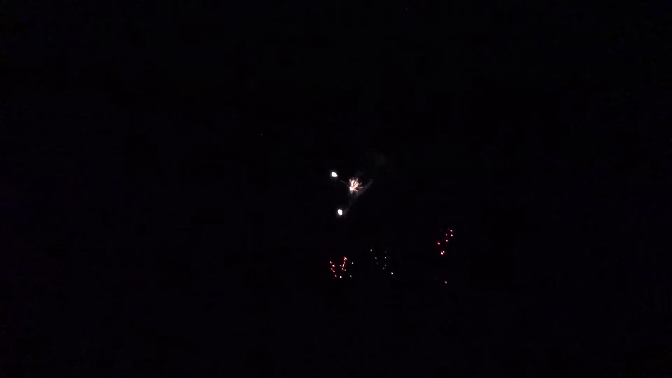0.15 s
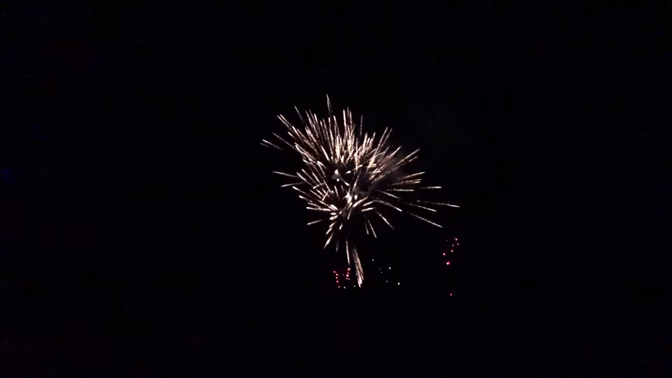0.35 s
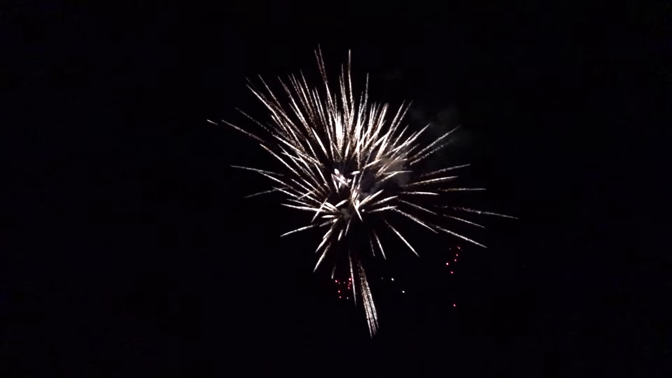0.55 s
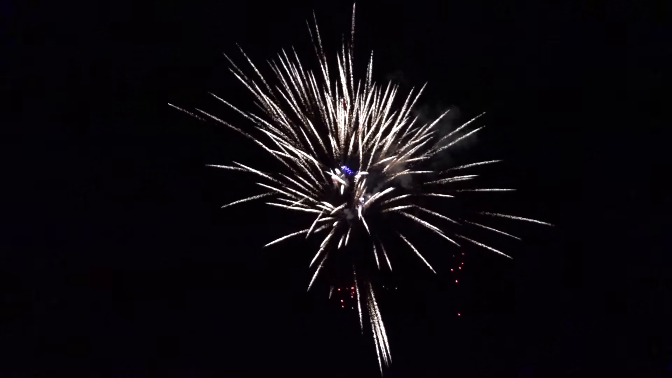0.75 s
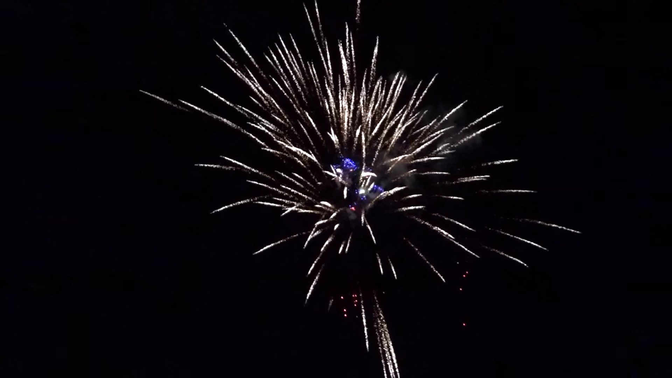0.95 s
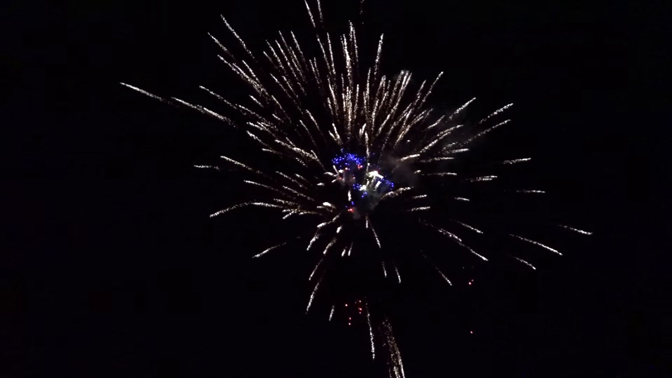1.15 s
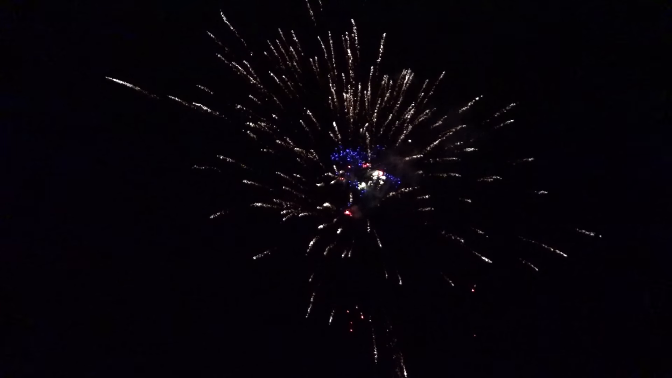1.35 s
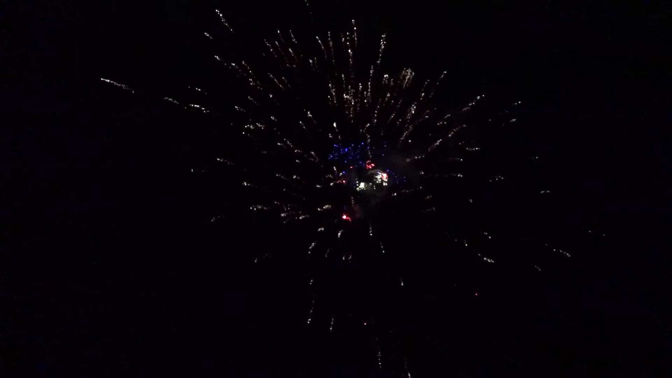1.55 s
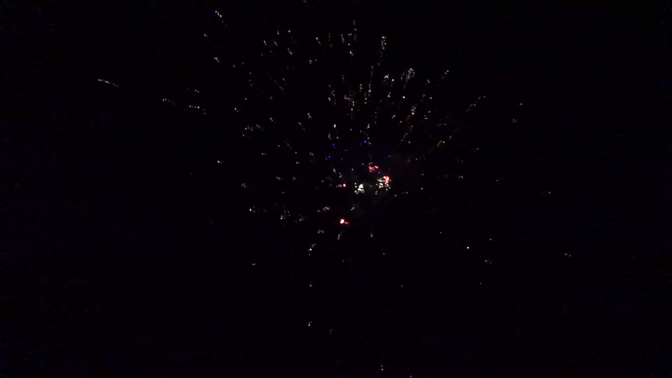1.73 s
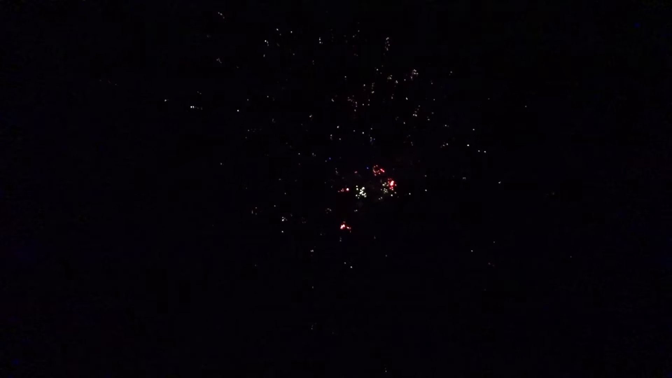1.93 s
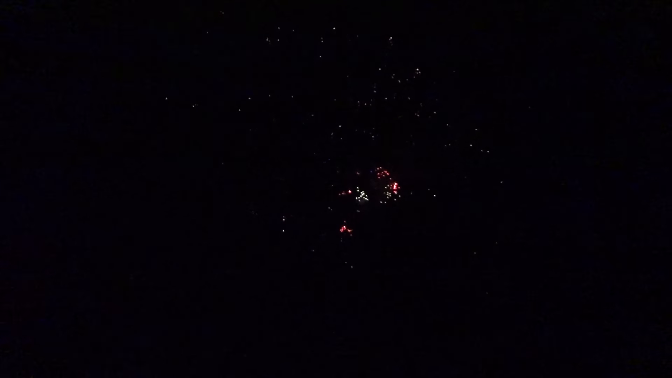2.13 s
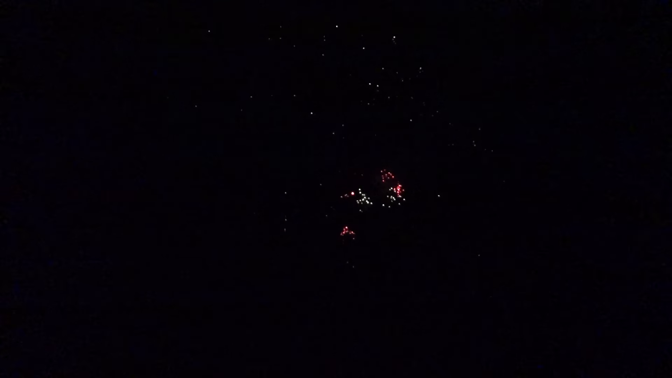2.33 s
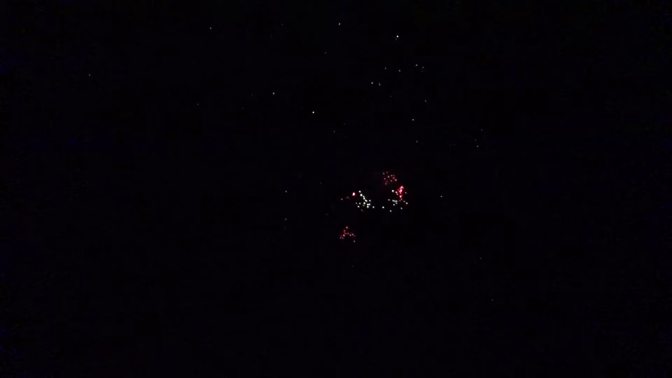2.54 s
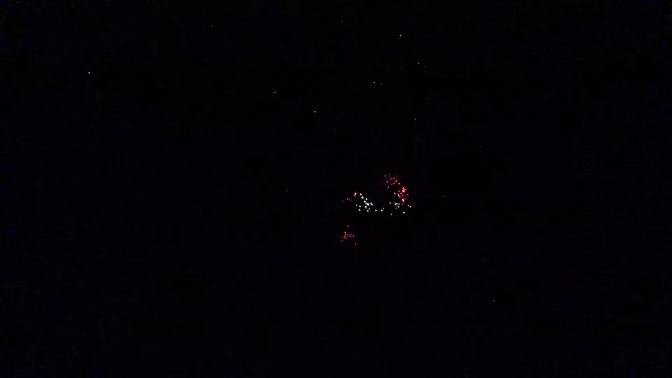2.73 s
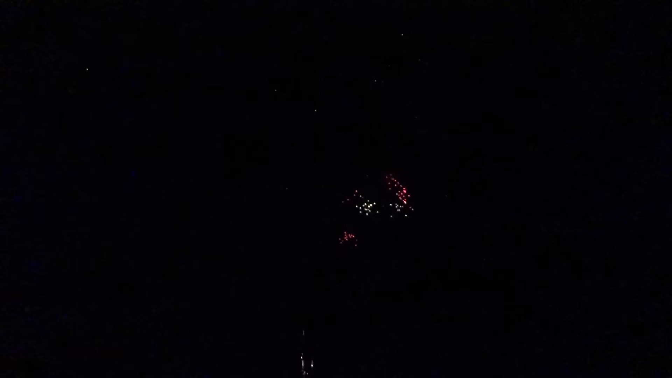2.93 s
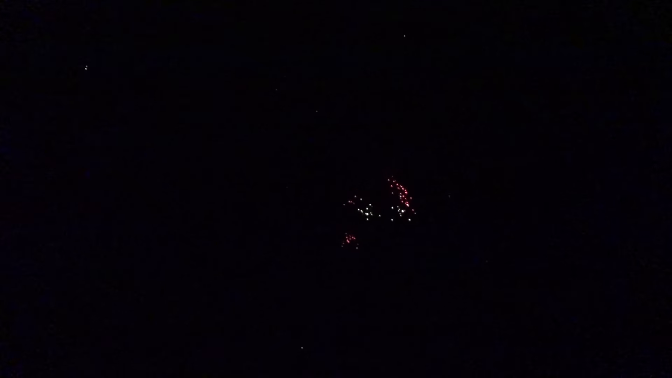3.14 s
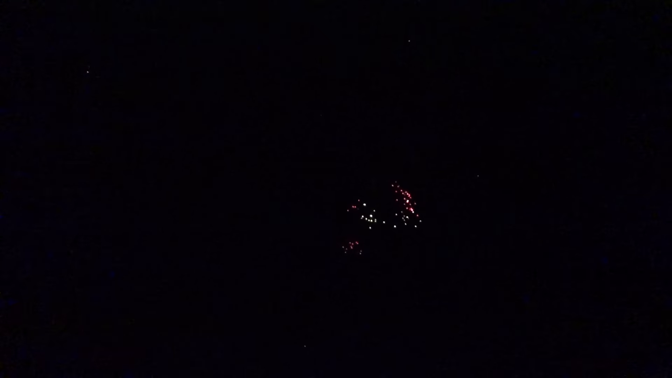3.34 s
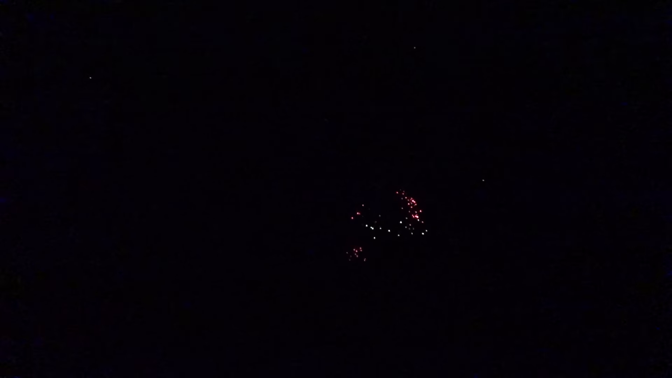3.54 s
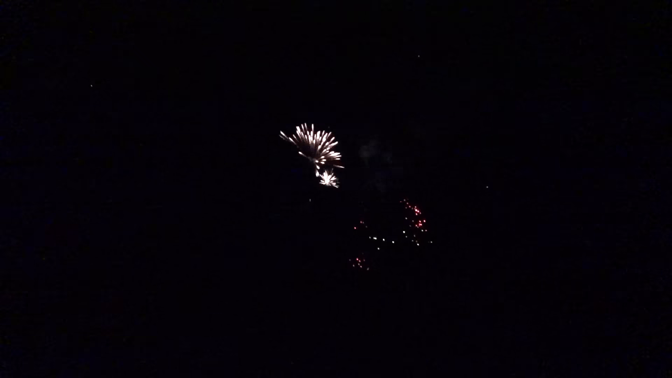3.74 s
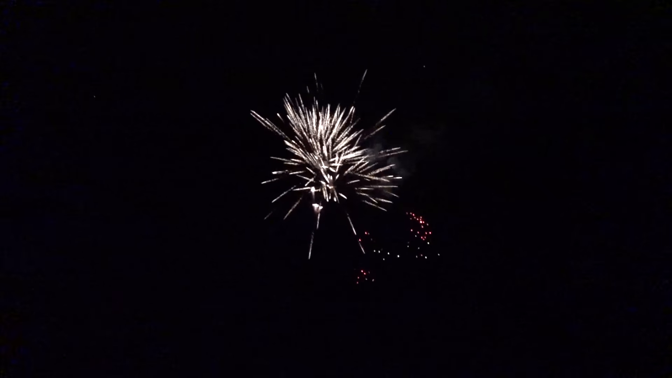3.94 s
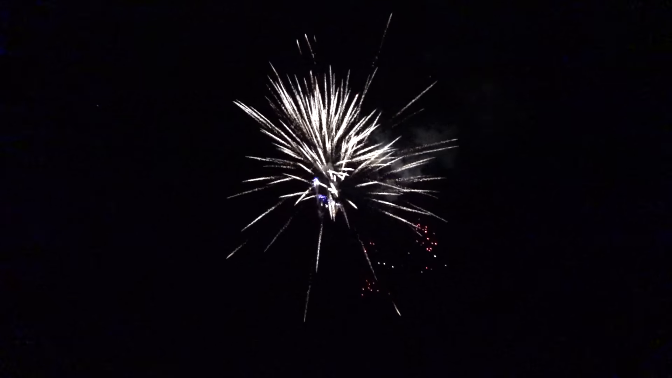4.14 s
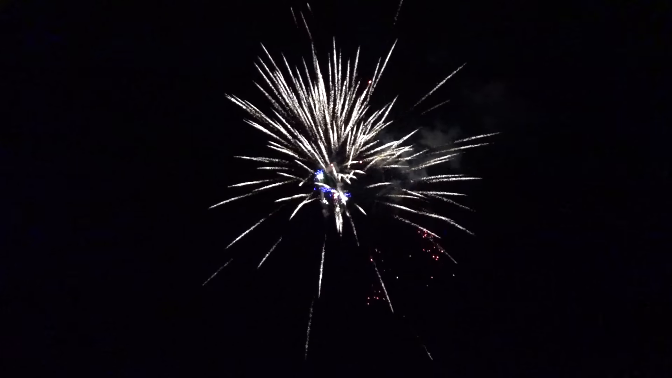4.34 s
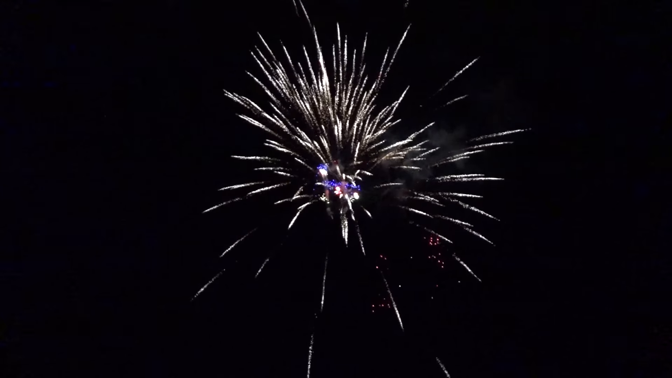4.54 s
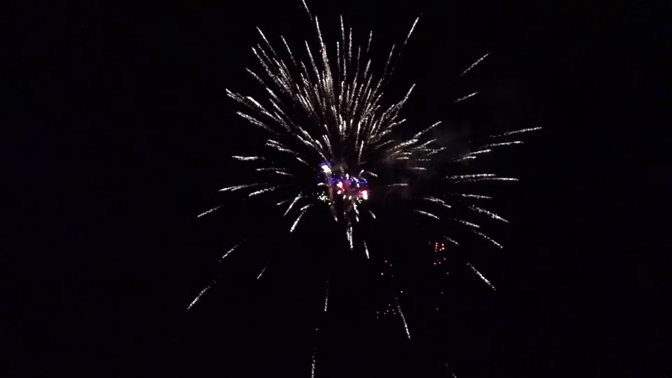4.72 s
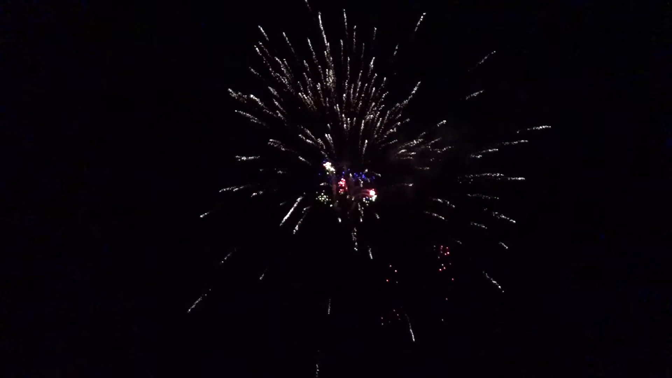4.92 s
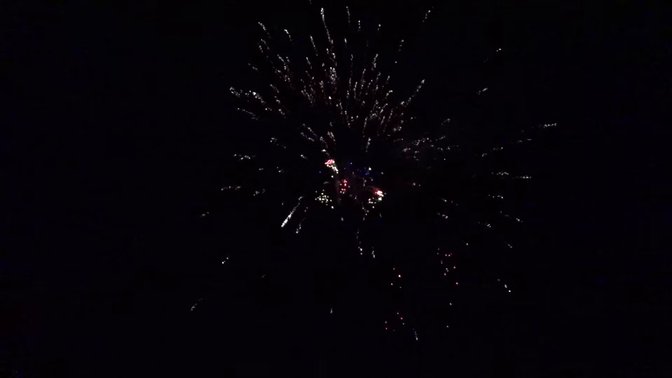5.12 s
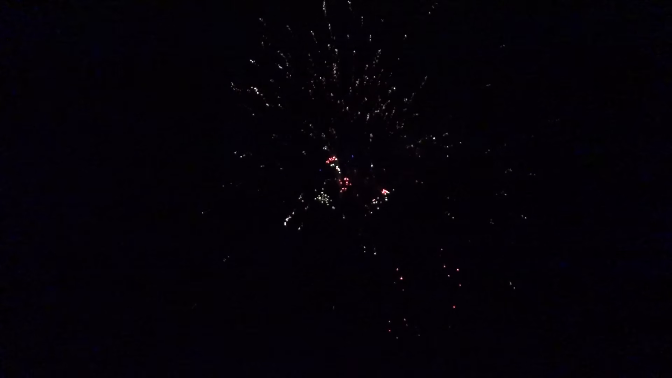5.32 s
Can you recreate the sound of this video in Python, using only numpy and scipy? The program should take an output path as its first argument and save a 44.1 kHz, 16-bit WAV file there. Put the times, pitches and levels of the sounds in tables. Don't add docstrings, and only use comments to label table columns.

```python
import sys
import numpy as np
from scipy import signal
from scipy.fft import rfft, irfft
from scipy.io import wavfile
from scipy.ndimage import uniform_filter1d

SR = 44100
rng = np.random.default_rng(int(sys.argv[2]) if len(sys.argv) > 2 else 0)


def generate_wav(sig):
    pcm = np.round(np.clip(np.atleast_2d(sig).T, -1, 1) * 32767).astype(np.int16)
    wavfile.write(sys.argv[1], SR, pcm)


def convert_level_to_amplitude(level_db):
    exponent = np.asarray(level_db, float) / 20
    return 10 ** exponent


N = 237017
TIME, HZ = np.arange(N) / SR, np.fft.rfftfreq(N, 1 / SR)

# t/s, peak level/dB, fall to suction/ms, closing/ms, ground delay/ms, ground level/dB
SKY_SHOCKS = [(s, db, fall, closing, ground, less) for (s, ground),
              (db, fall, closing, less) in zip( [(.3406, 5.7), (.3582, 5.35), (.3622, 5.95), (3.1255, 2.6),
              (3.8262, 6.0), (3.921, 5.8), (3.9706, 6.0)], [(23.0, 1.05, 0.91, -19), (0.5, 1.43, 1.26, -8),
              (2.3, 1.12, 0.45, -6.5), (2.4, 0.15, 0.19, -6.0), (23.0, 0.95, 0.63, -20.5),
              (16, 1.2, 0.56, -16.0), (24, 1.14, 1.02, -21.5)])]
# t/s, peak level/dB, fall to suction/ms, closing/ms, fence ring f/Hz
SHOTS = [
    (2.6655, 2.995, 1.72, 2.9, 3440),
    (2.7157, 3.005, 1.26, 1.56, 3350),
    (2.763, 3.992, 2.1, 1.85, 3330),
    (2.8086, 3.007, 1.5, 2.2, 3200),
    (2.8524, 4.01, 2.2, 1.9, 3030),
    (2.893, 3.99, 1.24, 3, 2380),
]
# arrival t/s, end t/s
SHOT_SPANS = [
    (.001, .145),
    (.05, .75),
    (.65, .95),
]


def evened(x):
    return x / np.sqrt(np.mean(x ** 2) + 1e-20)


def read(points):
    f, value = np.transpose(points)
    return np.interp(np.log(HZ + 1), np.log(f + 1), value)


def add(mix, s, sound):
    part = mix[..., round(s * SR):][..., :sound.shape[-1]]
    part += sound[..., :part.shape[-1]]


def add_to_ports(mix, s, sound):
    add(mix[0], s, sound)
    add(mix[1], s + 1 / SR, sound)


def shock(db, fall_ms, closing_ms, suction=.9, rise_ms=.045):
    ms = np.arange(400) / SR * 1000
    swing = np.cos(np.pi * np.interp(ms, [0, fall_ms, fall_ms + closing_ms], [0, 1, 2]))
    push = (1 - suction + (1 + suction) * swing) / 2
    pull = suction * (swing - 1) / 2
    return convert_level_to_amplitude(db) * np.minimum(ms / rise_ms, 1) * np.where(ms < fall_ms, push, pull)


def bursts():
    out = np.zeros((2, N))
    for s, db, fall_ms, closing_ms, ground_ms, ground_db in SKY_SHOCKS:
        suction = .9 if fall_ms > .5 else .35
        add_to_ports(out, s, shock(db, fall_ms, closing_ms, suction))
        bounce = shock(db + ground_db, 1.09 * fall_ms, 1.38 * closing_ms, suction, rise_ms=.042)
        add_to_ports(out, s + ground_ms / 1000, bounce)
    return out


def mortars():
    walls = [
        (.0118, -16.5, 230, .02, 0),
        (.0183, -12.5, 290, .03, 0),
        (.0263, -14, 5200, .004, 2.5),
        (.0265, .5, 1600, .0055, 2.5),
        (.0275, -19, 1200, .03, 2),
        (.376, -25, 210, .03, 0),
        (.3762, -28, 1150, .014, 0),
        (.5262, -27, 1650, .007, 0),
    ]
    out = np.zeros((2, N))
    for s, db, fall_ms, closing_ms, *_ in SHOTS:
        add_to_ports(out, s, shock(db + 3, fall_ms, closing_ms, suction=.55, rise_ms=.055))
        for delay, wall_db, hz, t60, pan_db in walls:
            pan = convert_level_to_amplitude([[pan_db / 2], [-pan_db / 2]])
            level_db = wall_db - 22 * (s - 2.66) + rng.normal(0, .86)
            slap = ring(level_db, hz * rng.uniform(.74, 1.12), t60, rough=.14)
            add(out, s + delay, pan * slap)
    return out


def ring(db, hz, t60, rough=.3):
    t, chance = TIME[:3000], rng.standard_normal(3000)
    wobble = np.cumsum(uniform_filter1d(rough * chance, size=9)) * np.sqrt(hz / SR)
    fade = np.minimum(t * hz * 2, 1) * np.clip(2 - 2 * t / t[-1], 0, 1)
    decay = convert_level_to_amplitude(db - 60 * t / np.clip(t60, .001, .09))
    return decay * fade * np.sin(2 * np.pi * hz * t + wobble)


def fence():
    first, spacing, t60 = (.112, .0033, .0024)
    out = np.zeros(N)
    for s, *_, hz in SHOTS:
        for k in range(12):
            rib = ring(-13.5, hz * (.92 + .015 * k), t60, rough=.15)
            rib = rib + ring(-19, .62 * hz, t60, rough=.15)
            add(out, s + first + k * spacing, rib)
    return out


def slaps():
    # t/s, peak level/dB, f/Hz, t60/s; dull house echoes, bright ones, ticks, far chirps
    thumps = [(0.723, -4, 272, 0.028), (0.989, -26, 240, 0.033), (1.087, -14, 148, 0.044),
              (1.16, -10.5, 180, 0.048), (1.171, -13, 187, 0.031), (1.232, -16.5, 184, 0.15),
              (2.117, -25, 530, 0.051), (3.137, -30, 173, 0.03), (4.334, -12, 322, 0.041),
              (4.771, -6, 154, 0.027), (5.292, -19, 191, 0.026)]
    claps = [(0.612, -20, 587, 0.0066), (0.758, -28, 1380, 0.016), (0.774, -20.5, 1700, 0.023),
             (0.844, -12, 686, 0.023), (0.884, -30, 1040, 0.0099), (1.721, -32, 1390, 0.077),
             (3.591, -39, 576, 0.025), (4.353, -21, 1684, 0.043), (4.48, -23, 1695, 0.045),
             (5.259, -29.5, 900, 0.077)]
    ticks = [(1.7215, -41.5, 5300, 0.015), (2.1045, -39.5, 6400, 0.0065), (2.1344, -57, 4750, 0.008),
             (2.2932, -54, 4520, 0.008)]
    chirps = [(2.245, -39, 1513, 0.091), (2.39, -46, 1700, 0.087), (2.47, -46, 1740, 0.1),
              (3.46, -43, 1650, 0.036), (3.5, -43, 1740, 0.045)]
    out = np.zeros(N)
    for table, gain_db, rough in ((thumps, 1.5, .6), (claps, 1.5, 1.5), (ticks, 1.5, .8), (chirps, 0, .05)):
        for s, db, hz, t60 in table:
            add(out, s, ring(db + gain_db, hz, t60, rough))
    return out


def pair(a, b, same):
    c = np.clip(read(same), 0, 1)
    mid, side = np.sqrt((1 + c) / 2) * rfft(a), np.sqrt((1 - c) / 2) * rfft(b)
    return np.array([mid + side, mid - side])


def echo_power(band, step=64):
    # t/s, level/dB
    shell_rolls = [
        (.345, -1.03),
        (3.83, -3),
        (3.94, 0),
    ]
    # arrival t/s, end t/s
    shell_spans = [
        (.001, .39),
        (.1, 2.3),
        (.56, .92),
        (.95, 1.33),
        (1.5, 1.79),
    ]
    # (deep, boom, crash, hiss level/dB against the body)
    shell_echoes = [
        ((-14.5, 56.7), (-12, -2, -3.5, -5)),
        ((-33.5, 5.6), (-11, -14.5, -2, -7.5)),
        ((-36, -6), (3.5, 2.5, -3.5, -24.5)),
        ((-37, 22.5), (3.5, -7, -7, -34)),
        ((-43, -18), (-3, -9.5, -13.5, -27)),
    ]
    shot_echoes = [
        ((-29, 55), (-3, -0.5, -3, -12.5)),
        ((-51, 25.7), (4.4, 7.9, 1.8, 1.5)),
        ((-68, 1.3), (18, 3, 0, 5)),
    ]
    # t/s, level/dB; then their span and echo, columns as above
    facades = [(.755, 2.2), (1.716, -26.5), (3.585, -21), (4.197, -3)]
    facade_span = [(.001, 0.025)]
    facade_echo = [((-41, 45), (-5, -7, 5, 0.5))]
    # start t/s, end t/s; then level/dB per band
    climbs = [
        (-1, .34),
        (2.9, 3.83),
    ]
    climb_db = [-42.5, -51, -58, -64, -64.5]
    # share of the fade, air absorption/dB per s
    fade_share = [.55, .7, 1.01, 1.25, 1.3]
    air_db_per_s = [.1, .15, .2, 3, 14]
    rise_share, fall_s, edge_db = .12, .04, 14

    now = TIME[::step]
    power = convert_level_to_amplitude(2 * climb_db[band]) * sum((now > a) & (now < b) for a, b in climbs)
    shots_alike = [(row[0], 0) for row in SHOTS]
    for shots, spans, echoes in ((shell_rolls, shell_spans, shell_echoes), (facades, facade_span, facade_echo),
                                 (shots_alike, SHOT_SPANS, shot_echoes)):
        for (arrives, ends), ((db, fade), (deep_db, boom_db, *treble_db)) in zip(spans, echoes):
            colour_db = [deep_db, boom_db, 0, *treble_db][band]
            first, last = arrives * (1 - rise_share), ends + fall_s * min(1, ends * 10)
            for s, shot_db in shots:
                t = np.clip(now - s, first, last)
                edges = np.interp(t, [first, arrives, ends, last], [-edge_db, 0, 0, -edge_db])
                level = db + colour_db + shot_db - fade * fade_share[band] * (t - arrives)
                level = level - air_db_per_s[band] * t
                power = power + convert_level_to_amplitude(2 * (level + edges)) * (t > first) * (t < last)
    return np.interp(TIME, now, power)


def roll(per_s=20000, spread_db=.57, lumpy_db=1.5):
    roll_hz = [130, 270, 560, 2000, 6500]
    # f/Hz, level/dB per Hz
    colour = [(53, -44), (90, -0.5), (243, 2.5), (337, -3), (685, -12), (758, -14.5), (892, -12.5),
              (2560, -20), (7820, -40), (10600, -53), (11500, -59), (15000, -104), (22000, -120)]
    # f/Hz, left-right likeness
    likeness = [(60, 0.76), (170, 0.76), (490, 0.73), (1410, 0.82), (4030, 0.69), (11600, 0.13)]
    # f/Hz, left-right level/dB
    lean = [(60, -0.5), (220, 3), (830, 2), (3100, 0.5), (11600, -1)]
    taps = rng.standard_normal((2, N)) * (rng.random((2, N)) < per_s / SR)
    taps *= convert_level_to_amplitude(spread_db * np.minimum(rng.exponential(1, (2, N)), 4))
    lean_db = read(lean) / 2
    z = pair(*taps, likeness) * convert_level_to_amplitude(read(colour) + [lean_db, -lean_db])
    out = np.zeros((2, N))
    for k, share in enumerate(np.eye(len(roll_hz))):
        band = irfft(z * np.interp(np.log(HZ + 1), np.log(roll_hz), share), N)
        lumps = evened(uniform_filter1d(uniform_filter1d(rng.standard_normal(N), 500), 500))
        out += evened(band) * np.sqrt(echo_power(k)) * convert_level_to_amplitude(lumpy_db * lumps)
    return out


def smear():
    shape = np.zeros(N)
    for table, smear_db in ((SKY_SHOCKS, -33), (SHOTS, -31)):
        for s, db, *_ in table:
            fizz_db = smear_db + min(db, 0)
            add(shape, s - .007, convert_level_to_amplitude(fizz_db) * signal.windows.tukey(750, .5))
            add(shape, s - .001, convert_level_to_amplitude(fizz_db + 10) * np.hanning(130))
    fizz = signal.sosfilt(signal.butter(1, 2500, fs=SR, output="sos"), rng.standard_normal((3, N)))
    return shape * evened(fizz[0] + .92 * fizz[1:])


def rumble():
    # t/s, level/dB
    gusts = [(0.0, -45), (0.25, -52), (0.48, -43), (0.75, -45), (1.02, -40), (1.75, -45), (2.11, -49),
             (2.23, -48), (2.68, -49), (2.83, -42.5), (3.22, -48), (3.45, -48), (4.07, -45.5), (4.25, -42),
             (5.37, -38)]
    deep = signal.butter(2, [32, 105], "band", fs=SR, output="sos")
    a, b, c = signal.sosfilt(deep, rng.standard_normal((3, N)))
    gust_db = np.interp(TIME, *np.transpose(gusts))
    return evened(np.array([1.6 * a + .3 * b, a + .33 * c])) * convert_level_to_amplitude(4.5 + gust_db)


def night():
    # f/Hz, level/dB per Hz
    colour = [(12, -27), (20, 20.5), (91, 0), (182, 3), (243, -43), (363, -28), (486, -14.5), (872, -18.5),
              (1610, -22.5), (3670, -43), (7520, -33.5), (10600, -40.5), (11500, -53), (15000, -100),
              (22000, -120)]
    # f/Hz, left-right likeness
    likeness = [(60, 0.64), (220, 0.43), (830, 0.51), (3100, 0.6), (11600, 0.21)]
    z = pair(*rng.standard_normal((2, N)), likeness) * convert_level_to_amplitude(read(colour))
    drift = evened(uniform_filter1d(uniform_filter1d(rng.standard_normal(N), 3000), 3000))
    return evened(irfft(z, N)) * convert_level_to_amplitude(-39.5 + 1.2 * drift)


def starve(x):
    dull = [(.372, .379, 4500), (2.643, 2.656, 60), (2.652, 2.661, 2500), (3.112, 3.119, 2000),
            (3.134, 3.151, 4500), (3.796, 3.808, 60), (3.806, 3.819, 700), (3.934, 3.958, 4600),
            (3.983, 4.002, 4200)]
    after_shot = ((.011, .016, 3320), (.012, .021, 5500), (.031, .032, 5200), (.011, .048, 8300))
    rows = dull + [(row[0] + a, row[0] + b, hz) for row in SHOTS[:-1] for a, b, hz in after_shot]
    for hz in {row[2] for row in rows}:
        gate = sum(np.interp(TIME, [a - .001, a + .001, b - .001, b + .001], [0, 1, 1, 0])
                   for a, b, f in rows if f == hz)
        treble = irfft(rfft(x.mean(0)) * np.clip(HZ / hz * 10 - 9, 0, 1), N)
        x = x - np.minimum(gate, 1) * treble
    return x


def sides(x):
    dull_sides = [
        (2.645, 2.66),
        (3.797, 3.817),
    ]
    mid, side = x.mean(0), (x[0] - x[1]) / 2
    gate = sum(np.interp(TIME, [a - .001, a, b, b + .001], [0, 1, 1, 0]) for a, b in dull_sides)
    side = side - gate * irfft(rfft(side) * (HZ > 1700), N)
    first, last = SHOTS[0][0], SHOTS[-1][0] + SHOT_SPANS[0][1]
    bass = signal.sosfilt(signal.butter(1, 1500, fs=SR, output="sos"), side)
    yard = np.interp(TIME, [first - .01, first, last, last + .05], [0, 1, 1, 0])
    side = side - (1 - .6) * bass * yard
    return np.array([mid + side, mid - side])


def ducking(table, depth_db, lead, hold, release):
    dips = [np.interp(TIME - row[0], [-lead - .008, -lead, hold, hold + release], [0, -depth_db, -depth_db, 0])
            for row in table]
    return np.min(dips, axis=0)


def scene():
    shells = [row for row in SKY_SHOCKS if row[2] > .5]
    shell_gain_db = ducking(shells, 17.0, .0012, .031, .03)
    shot_gain_db = ducking(SHOTS, 8.3, .0038, .018, .0084)
    gain = convert_level_to_amplitude(np.minimum(shell_gain_db, shot_gain_db))
    quiet = gain * (roll() + night() + rumble() + fence())
    return bursts() + mortars() + slaps() + smear() + sides(starve(quiet))


def roll_off(x):
    return signal.sosfilt(signal.butter(12, 12150, fs=SR, output="sos"), x)


def record(dry):
    cut = 1.65 * np.tanh(dry / 1.65)
    for hz in (78, 48):
        cut = signal.sosfilt(signal.butter(1, hz, "high", fs=SR, output="sos"), cut)
    soft = signal.sosfilt(signal.cheby2(10, 45, 11350, fs=SR, output="sos"), np.clip(cut, -1.06, 1.06))
    return roll_off(np.clip(soft, -.99, .99))


dry = scene()
out = record(dry)
generate_wav(out)
```